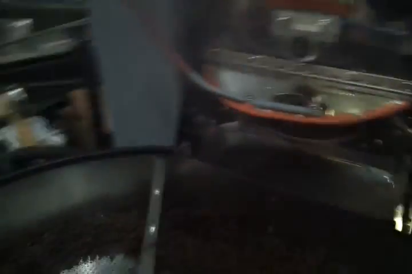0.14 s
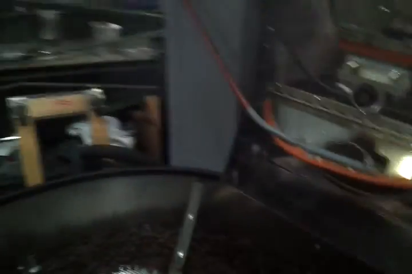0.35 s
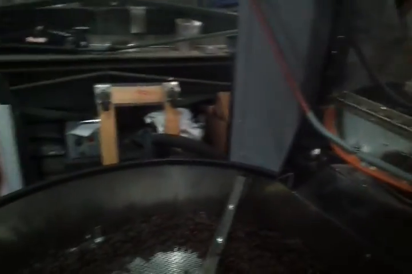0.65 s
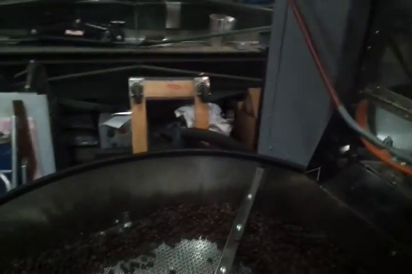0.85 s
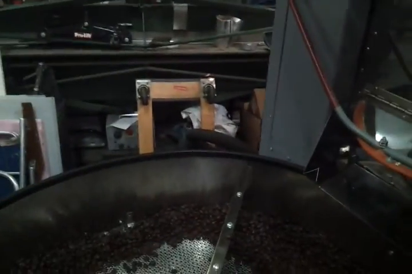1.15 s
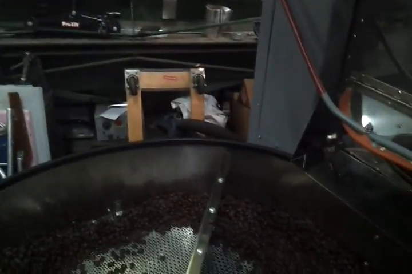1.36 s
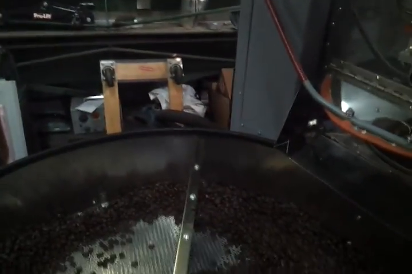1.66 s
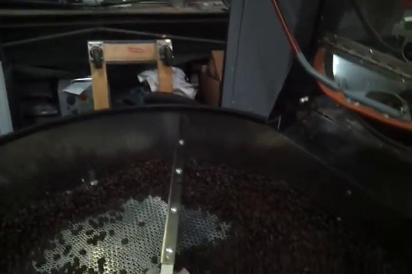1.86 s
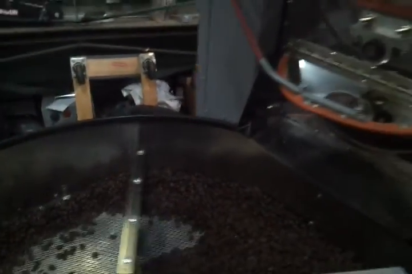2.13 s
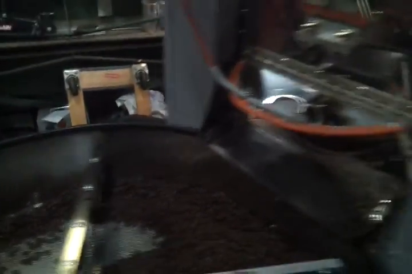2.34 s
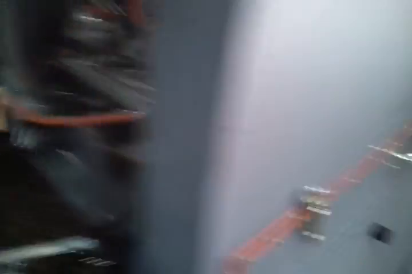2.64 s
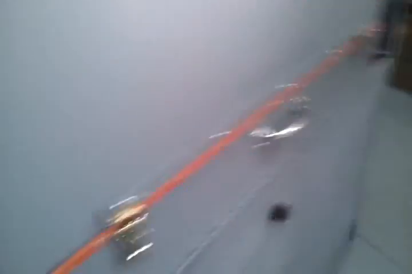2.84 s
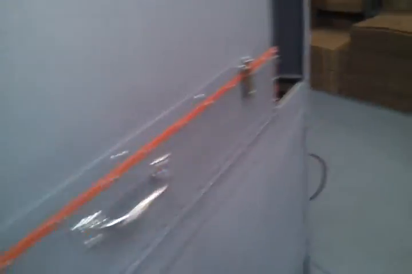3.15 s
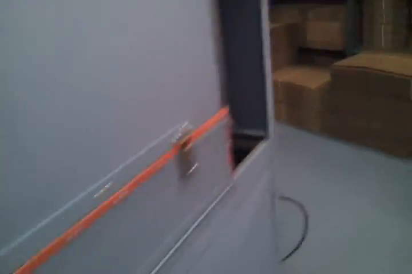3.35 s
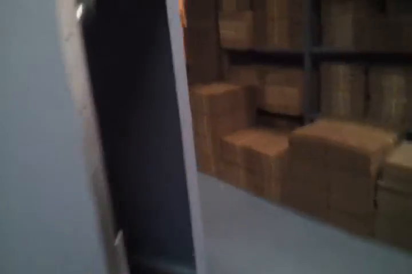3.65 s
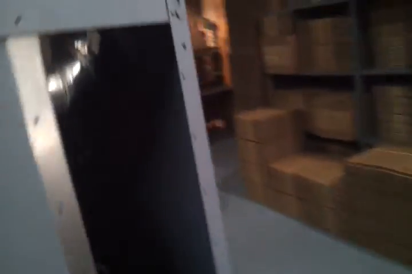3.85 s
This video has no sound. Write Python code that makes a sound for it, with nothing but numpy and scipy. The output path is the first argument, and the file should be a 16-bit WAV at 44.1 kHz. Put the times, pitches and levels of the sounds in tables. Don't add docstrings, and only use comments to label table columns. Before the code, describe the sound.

Loud roaster fan roar with humming tone and bean rattle, one steel clank, fading behind a cabinet

```python
import sys
import numpy as np
from scipy import signal
from scipy.fft import rfft, irfft
from scipy.io import wavfile
from scipy.ndimage import uniform_filter1d

SR = 44100
rng = np.random.default_rng(int(sys.argv[2]) if len(sys.argv) > 2 else 0)


def int16_out(signal):
    q = np.round(np.clip(np.atleast_2d(signal).T, -1, 1) * 32767)
    wavfile.write(sys.argv[1], SR, q.astype(np.int16))


def elevation(decibels):
    levels = np.asarray(decibels, float)
    return 10 ** (levels / 20)


N = 176400
NEAR_DB, FAR_DB = -37, -59.5
ROAR, BLADE, SECOND, FOURTH = 1, 2, 3, 4


def evened(x):
    return x / np.sqrt(np.mean(x ** 2) + 1e-20)


def read(points, hz):
    f, value = np.transpose(points)
    return np.interp(np.log(hz + 1), np.log(f + 1), value)


def colour(x, points):
    gain_db = read(points, np.fft.rfftfreq(len(x), 1 / SR))
    return irfft(rfft(x) * elevation(gain_db), len(x))


def walk(column, t):
    # t/s, roar/dB, blade tone/dB, second harmonic/dB, fourth harmonic/dB
    beside_tray = [(0, -36.5, -42.5, -57, -65), (.13, -34, -44, -45.5, -62), (.3, -35, -46.5, -45.5, -64),
                   (.48, -36, -49, -37.5, -62), (.68, -36.5, -58, -39.5, -64),
                   (.95, -36, -45.5, -39, -46.5), (1.3, -36, -43.5, -40.5, -51),
                   (1.65, -36.5, -49, -41, -53), (2.1, -37.5, -47.5, -41.5, -50.5)]
    behind_cabinet = [(2.6, -36.5, -46.5, -38, -53.5), (2.68, -36.5, -54, -41, -42.5),
                      (2.79, -37, -45, -43, -40), (2.85, -37.5, -59, -43, -66),
                      (3.05, -41, -48, -46.5, -57), (3.25, -44, -41, -53.5, -66),
                      (3.55, -48, -45, -52.5, -75), (3.7, -48.5, -57.5, -60, -67), (4, -50, -52, -55, -77)]
    rows = np.array(list(beside_tray) + list(behind_cabinet))
    return np.interp(t, rows[:, 0], rows[:, column])


def slow(top_hz):
    t = np.arange(0, N, 256) / SR
    wander = np.zeros(len(t))
    for f in np.geomspace(top_hz / 20, top_hz, num=12):
        wander += np.sin(2 * np.pi * (f * t + rng.random())) / np.sqrt(f)
    return np.interp(np.arange(N) / SR, t, evened(wander))


def add(mix, s, sound):
    part = mix[round(s * SR):][:len(sound)]
    part += sound[:len(part)]


def drift(bins, frames, smooth_bins, smooth_frames):
    x = uniform_filter1d(rng.standard_normal((bins, frames)), size=smooth_bins, axis=0)
    return evened(uniform_filter1d(x, size=smooth_frames, axis=1))


def roar():
    # f/Hz, density/dB per Hz
    near = [(30, -40.5), (90, -23.5), (200, -12.5), (330, -7.5), (800, -10), (1700, -8), (3200, -11),
            (7000, -17.5)]
    # f/Hz, density/dB per Hz
    shadowed = [(30, -39), (80, -15), (200, 6.5), (350, -4), (860, -7), (1300, -9.5), (2600, -11.5),
                (7000, -22)]
    # f/Hz, width/Hz, level/dB
    resonances = [(557, 32, 3.5), (1400, 160, -0.5), (1905, 300, 2), (2270, 260, -2), (3756, 380, -8.5),
                  (4360, 500, 1), (455, 77, -8)]
    hop, frames = 512, N // 512 + 5
    hz = np.fft.rfftfreq(2048, 1 / SR)
    bins = len(hz)
    patches = drift(bins, frames, 16, 16)
    streaks = drift(bins, frames, 2, 40)
    flicker = drift(bins, frames, 240, 2)

    level_db = walk(ROAR, np.arange(frames) * hop / SR)
    far = np.clip((level_db - NEAR_DB) / (FAR_DB - NEAR_DB), 0, 1)
    duct_db = sum(db / (1 + ((hz - f) / w * 2) ** 2) for f, w, db in resonances)[:, None]
    shape_db = read(near, hz)[:, None] * (1 - far) + read(shadowed, hz)[:, None] * far
    shape = elevation(shape_db + duct_db * np.clip(1 - 1.3 * far, 0, 1))
    middle = (hz > 800) & (hz < 3500)
    shape = shape / np.sqrt((shape[middle] ** 2).sum(0))

    noise = rng.standard_normal((bins, frames)) + 1j * rng.standard_normal((bins, frames))
    z = noise * shape * elevation(0.61 * patches + 2 * streaks + 1.12 * flicker)
    x = signal.istft(z, nperseg=2048, noverlap=2048 - hop)[1][:N]
    trim_db = 4
    return evened(x) * elevation(walk(ROAR, np.arange(N) / SR) + trim_db)


def blade_tone():
    blade_hz, trim_db = 354.35, -0.5
    t, out = np.arange(N) / SR, np.zeros(N)
    turns = blade_hz * t + 0.049 * slow(4)
    for k, column, waver_db in [(1, BLADE, 3.5), (2, SECOND, 1), (4, FOURTH, 1)]:
        level_db = walk(column, t) + trim_db + waver_db * slow(16)
        out += elevation(level_db) * np.sin(2 * np.pi * k * turns)
    return np.sqrt(2) * out


def motor():
    # f/Hz, level close by/dB, share of fade, waver/dB
    lines = [(120.6, -64.5, -0.38, 1.5), (854, -53, 0.47, 1.5), (984, -52, 0.82, 1.5),
             (744, -61.5, 0.58, 8), (1056, -60.5, 0.43, -5), (1543, -60, 0.79, 1), (1780, -56.5, 1, 0.5)]
    t, out = np.arange(N) / SR, np.zeros(N)
    fade_db = walk(ROAR, t) - NEAR_DB
    for hz, db, share, waver_db in lines:
        out += elevation(db + share * fade_db + waver_db * slow(9.6)) * np.sin(2 * np.pi * hz * t)
    return np.sqrt(2) * out


def beans():
    # t/s, length/s, level/dB
    surges = [(0.169, 0.061, 2.7), (.49, 0.071, 4.8), (.68, 0.094, 6.1), (1.07, 0.037, 3.8),
              (1.201, 0.025, 2.2), (1.305, 0.016, 6), (1.83, 0.056, 3.6), (2.17, 0.071, 5.2),
              (2.55, 0.023, 3.2), (2.85, 0.042, 6)]
    beans_db, beans_per_s, spread_db, fade_share = -43, 5000, 2, 1.62
    t, out = np.arange(N) / SR, np.zeros(N)
    size = elevation(spread_db * np.minimum(rng.exponential(1, N), 5))
    size = size * (rng.random(N) < beans_per_s / SR)
    pitch = rng.integers(0, 14, N)
    u = np.arange(200) / 200
    for k, hz in enumerate(np.geomspace(3694, 6120, num=14)):
        grain = np.sin(2 * np.pi * hz * u * 200 / SR) * u ** 0.5 * elevation(-45 * u)
        out += signal.oaconvolve(size * (pitch == k), grain)[:N]
    surge_db = sum(db * np.exp(-0.5 * ((t - s) / length * 2) ** 2) for s, length, db in surges)
    return evened(out) * elevation(beans_db + surge_db + fade_share * (walk(ROAR, t) - NEAR_DB))


def tap(db, hz, t60):
    t = np.arange(20000) / SR
    band = [(hz / 3, -40), (hz / 1.4, -8), (hz, 0), (hz * 1.4, -8), (hz * 3, -45)]
    noise = evened(colour(rng.standard_normal(len(t)), band))
    pitched = np.sin(2 * np.pi * hz * t) * elevation(-60 * t / t60 * (2.5 - 1))
    rise = np.minimum(t / max(0.0006, 0.5 / hz), 1)
    burst = elevation(-60 * t / t60) * rise * (pitched + 0.5 * noise)
    return elevation(db) * burst / abs(burst).max()


def ticks_and_knocks():
    # t/s, peak/dB, f/Hz, t60/s
    ticks = [(.1665, -25, 5380, .03), (.2045, -24, 2600, .03), (.205, -25, 3900, .04),
             (.208, -25, 1800, .03), (.3168, -19, 5540, .025), (1.0206, -27, 5830, .02),
             (1.052, -22, 5500, .04), (1.075, -24, 5000, .05), (1.3024, -24, 4080, .03),
             (1.505, -25, 4370, .06), (1.6846, -30, 4340, .03), (2.6174, -28, 5340, .02),
             (2.7656, -28, 5050, .02), (2.85, -30, 5200, .04), (3.1073, -30, 5240, .025),
             (3.3917, -36, 6020, .02), (3.6057, -37, 5200, .03), (3.611, -40, 6300, .02),
             (3.6378, -30, 5900, .014)]
    # t/s, peak/dB, f/Hz, t60/s
    knocks = [(.187, -25, 1500, .04), (.196, -22, 1150, .09), (.206, -22, 1050, .05),
              (.2255, -18, 1050, .035), (.234, -26, 1900, .05), (.07, -28, 560, .3), (3.225, -41, 100, .18),
              (1.42, -35, 190, .8), (3.4662, -35, 280, .09), (3.4675, -30, 700, .03),
              (3.468, -34, 1500, .02), (3.4745, -33, 1900, .025)]
    out = np.zeros(N)
    for s, db, hz, t60 in list(ticks) + list(knocks):
        add(out, s, tap(db, hz, t60))
    return out


def ring(modes, t):
    return sum(elevation(db - 60 * t / t60) * np.sin(2 * np.pi * hz * t) for hz, db, t60 in modes)


def clank():
    # t/s, level/dB
    blows = [
        (1.3930, -13.5),
        (1.3953, 3.5),
        (1.3968, -5.5),
        (1.3998, -2),
        (1.4035, -10),
        (1.4089, -16),
        (1.414, -14),
        (1.42, -13),
    ]
    # f/Hz, level/dB, t60/s
    steel = [(604, -8, 0.072), (783, -1.5, 0.1), (1055, 5.5, 0.054), (1235, 0, 0.11), (1360, 5, 0.034),
             (1487, -9, 0.12), (1836, -9.5, 0.076), (2130, -9.5, 0.067), (3908, -4.5, 0.083),
             (4100, -7, 0.088), (4300, -7.5, 0.11), (4800, -5, 0.042), (5258, -4.5, 0.06), (5570, 4, 0.025)]
    # f/Hz, level/dB, t60/s
    panel = [(419, -10, 1.1), (427, -9, 1.1), (527, -2, .35), (536, -4, .35), (851, 1, .45), (1061, -3, .4),
             (1211, -5, .25), (1771, -10, .6), (1830, -9, .4), (3144, -4, .4), (3214, -10, .3),
             (2950, -8, .15), (5809, -6, .25), (6485, -7, .13)]
    # f/Hz, level/dB
    crack_shape = [(60, -54), (300, -24.5), (600, -9), (1100, -4), (1900, -10.5), (2800, -11.5),
                   (4200, -10.5), (5500, -4), (7000, -11)]
    # f/Hz, t60/s
    room = [(300, 0.21), (700, 0.72), (1200, 0.57), (1600, 0.43), (3000, 0.29), (6000, 0.17)]
    steel_db, panel_db, crack_db, tail_db = -18.5, -25, -4, -13.5
    crack_t60_s = 0.019
    t, out = np.arange(SR // 2) / SR, np.zeros(N)
    main_s = blows[1][0]
    add(out, main_s, elevation(panel_db) * np.minimum(t / 0.0013, 1) * ring(panel, t))

    latch = elevation(steel_db) * ring(steel, t)
    for s, db in blows:
        crack = evened(colour(rng.standard_normal(len(t)), crack_shape))
        crack = crack * elevation(crack_db - 60 * t / crack_t60_s)
        add(out, s, elevation(db) * np.minimum(t / 0.0004, 1) * (latch + crack))

    noise = colour(rng.standard_normal(len(t)), crack_shape)
    hz, frame_s, z = signal.stft(noise, SR, nperseg=256)
    z = z / np.sqrt((abs(z) ** 2).sum(0).mean() * 2)
    decay = elevation(-60 * frame_s / read(room, hz)[:, None])
    tail = signal.istft(z * decay, SR, nperseg=256)[1][:len(t)]
    add(out, main_s, elevation(tail_db) * np.minimum(t / 0.009, 1) * tail)
    return out


def scene():
    out = roar() + blade_tone() + motor() + beans() + ticks_and_knocks() + clank()
    return out[None]


def band_limit(x):
    return signal.sosfilt(signal.butter(12, 16000, fs=SR, output="sos"), x)


def record(dry):
    # f/Hz, gain/dB
    slope = [(35, -18.5), (60, -6), (110, -1), (6500, 0.2), (7200, -5), (7600, -13.5), (7850, -30),
             (8000, -61)]
    # f/Hz, gain/dB
    mirror = [(8000, -43), (8150, 2.5), (8450, -15.5), (8700, -22), (9200, -51.5), (9500, -110),
              (10000, -160)]
    low_rate_hz, knee, ceiling = 16000, 0.95, 0.69
    x = colour(knee * np.tanh(dry[0] / knee), slope)
    folded = 2 * x * np.cos(2 * np.pi * low_rate_hz * np.arange(N) / SR)
    x = x + colour(folded, mirror)
    x = np.clip(x, -ceiling, ceiling)
    return band_limit(x[None])


dry = scene()
out = record(dry)
int16_out(out)
```